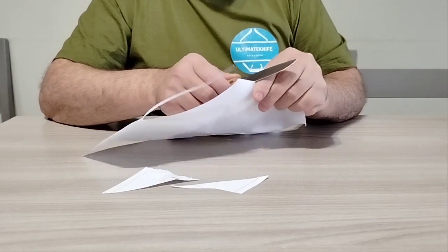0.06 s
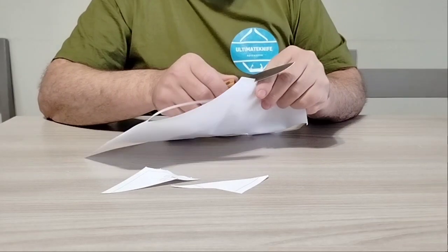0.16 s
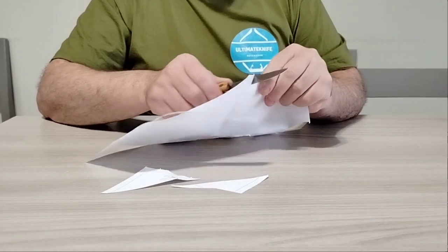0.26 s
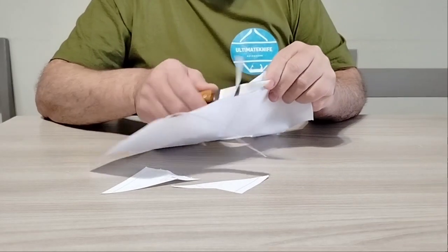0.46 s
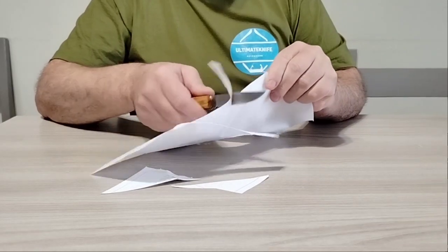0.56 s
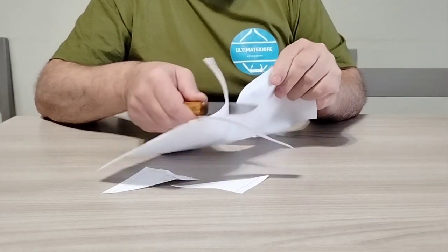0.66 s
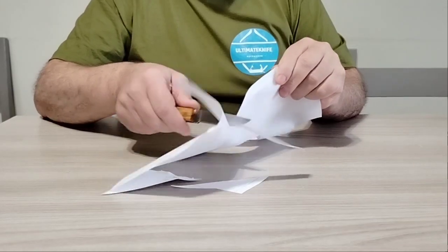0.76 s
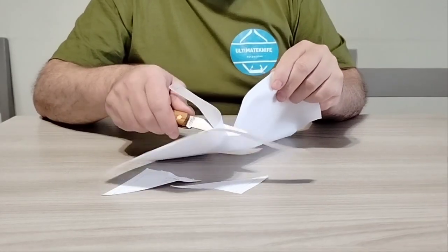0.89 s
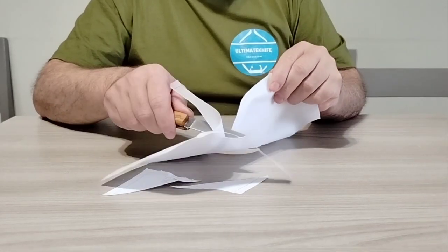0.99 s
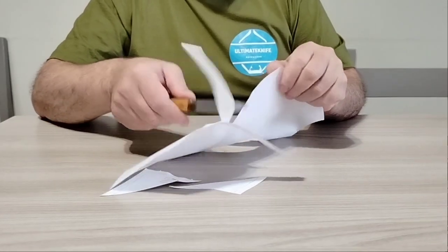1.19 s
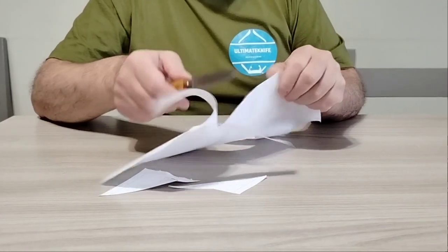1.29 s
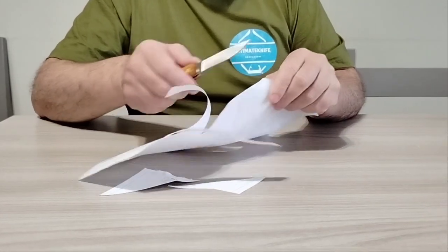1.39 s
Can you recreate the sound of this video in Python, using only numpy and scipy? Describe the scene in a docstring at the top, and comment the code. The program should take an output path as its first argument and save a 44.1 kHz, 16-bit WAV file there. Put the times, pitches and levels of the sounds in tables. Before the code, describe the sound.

A knife slices paper, heard close in a small, lively room. After near silence, a crisp crackling rip starts around 0.2 s, surges near 0.4 s, eases by 0.7 s, and swells again to a taut, ringing peak near 0.85 s. At 1.03 s the blade breaks free with a sharp crack, low puff and hollow sagging ring. Light flaps follow at 1.24 s, then bright papery rustling until about 1.45 s.

```python
"""Knife slicing paper

A sharp knife slices a hand-held sheet of paper above a table in a small, bare room; the stroke surges twice.
Random clicks stand for parting fibres: filters and resonances make them crackle, ring and shake the sheet.
The blade breaks free with a crack and the sheet flaps: shaped pulses and noise, low sine puffs, a sagging ring.
Fine filtered clicks make the blade's light slides and, in between, a rustle of the loose paper.
Decaying noise makes the room, steady noise its background."""
import sys
import numpy as np
from scipy import signal
from scipy.fft import rfft, irfft, next_fast_len
from scipy.io import wavfile
from scipy.ndimage import map_coordinates

SR = 44100
rng = np.random.default_rng(int(sys.argv[2]) if len(sys.argv) > 2 else 0)


def materialize(psi):
    """Save the field psi as 16-bit PCM at rate SR to the path in sys.argv[1].

    A 1-D psi becomes a single channel; in a 2-D psi each row is a channel.
    """
    bounded = np.clip(np.atleast_2d(psi).T, -1, 1)
    quanta = np.round(bounded * 32767).astype(np.int16)
    wavfile.write(sys.argv[1], SR, quanta)


N = 63945
TIME = np.arange(N) / SR

# Background spectrum. Each row: frequency in Hz, relative level in dB.
BACKGROUND_COLOUR = [(25, -12), (60, -15), (120, 0), (350, 0.5), (600, -10), (1100, -10.5), (3500, -8),
                     (7500, -8), (10000, -36), (16000, -45)]
BACKGROUND_DB = -71.5

# Decay of the room. Each row: frequency in Hz, t60 in seconds.
ROOM_T60 = [(100, .42), (400, .48), (1000, .44), (2400, .46), (4000, .38), (8000, .3), (15000, .21)]
# Strength of the room's tail. Each row: frequency in Hz, level in dB.
ROOM_LEVEL = [(100, -8), (350, -3.5), (750, -6.5), (1100, -1), (2300, 2), (4000, -3.5), (8000, -8),
              (11000, -0.5), (15000, 6)]
# The blade travels sideways. Each row: time in seconds, lag of the left channel in ms.
LEFT_LAG_MS = [(.55, 0.097), (.75, 0.27), (1.05, 0.248), (1.35, 0.085)]
ROOM_DELAY_S, DIRECT_DB = 0.011, 1.0
TABLE_T60_S, TABLE_DB, TABLE_ABOVE_HZ = 0.027, -2, 1140   # only short waves scatter off table and hands
LEAN_BASS_DB, LEAN_TREBLE_DB, LEAN_SPLIT_HZ = 0.77, 2.5, 1700   # added on the left, taken off on the right
SIDE_SHARE, SIDE_ABOVE_HZ = 0.8, 1370   # part of the clicks that differs between the sides

# The blade slides along the paper; in between, the loose paper rustles.
# Each row: start, length, attack and release in seconds, level in dB, low-pass corner in Hz.
SLIDES_AND_RUSTLE = [(-.02, 0.068, 0.046, 0.0092, -59, 7200), (1.212, 0.092, 0.015, 0.02, -62, 17000),
                     (1.32, 0.1, 0.057, .045, -44.5, 17200)]
# Spectrum of their hiss. Each row: frequency in Hz, relative level in dB.
HISS_COLOUR = [(100, -54), (500, -33), (1000, -23), (1500, -13.5), (2700, -19), (3500, -3.5), (5000, -14.5),
               (6900, 0.5), (8500, -6), (10000, -8), (15500, -13)]

# The bending sheet pushes air.
# Each row: start in seconds, level in dB, mean pitch in Hz, attack in seconds, t60 in seconds.
PUFFS = [(.86, -56, 165, 0.0099, 0.2), (.925, -54, 158, 0.032, 0.1), (1.025, -39.5, 108, 0.0022, 0.16),
         (1.2406, -45.5, 211.2, 0.002, 0.057), (1.241, -62.5, 115, 0.007, 0.49),
         (1.284, -49.5, 270.6, 0.016, 0.1)]

# Ring after the crack. Each row: starting frequency in Hz, width in Hz, level in dB.
AFTER_RING_MODES = [(1170, 45, -53), (1623, 53, -56.5), (2400, 520, -47.5)]
AFTER_RING_START_S, AFTER_RING_ATTACK_S, AFTER_RING_T60_S = 1.052, 0.025, 0.34
AFTER_RING_SAG_PER_S = 0.31   # exponential rate of the fall in pitch

# Cracks and flaps of the sheet.
# Each row: start in seconds, relative level in dB, low-pass corner in Hz, high-pass corner in Hz, t60 in seconds.
FLAPS = [(1.0254, 6, 3340, 910, 0.067), (1.031, 10, 4440, 370, 0.017), (1.0313, 13, 11500, 6700, 0.0039),
         (1.2265, -14, 9500, 4670, 0.025), (1.2412, -8, 1020, 150, 0.03), (1.2415, -11, 15200, 3540, 0.11),
         (1.295, -13, 1730, 453, 0.092), (1.342, -22.5, 2200, 169, 0.025), (1.433, -19, 1420, 610, 0.14)]
# Hollow knock of the sheet. Each row: frequency in Hz, relative level in dB, t60 in seconds.
KNOCK_MODES = [(396, -34.5, 0.038), (696, -29.5, 0.02), (2410, -29, 0.022)]
# Spectrum of a flap's crinkle. Each row: frequency in Hz, relative level in dB.
CRINKLE_COLOUR = [(40, -24), (210, -14), (385, 0.5), (530, -8), (720, 0.5), (930, 3), (1300, 0.5),
                  (1600, 1), (1950, -3), (2450, 4), (3200, 0.5), (4100, -3.5), (5600, -7), (7700, -2.5),
                  (9200, -16.5), (15000, -33)]

# Spectra of the fibres, the sheet's rasp in a short and a longer cut, and its low flutter.
# Each row: frequency in Hz, relative level in dB.
FIBRE_COLOUR = [(200, -88), (1400, -22), (2500, -4.5), (3400, 4), (4600, -5), (5600, -2.5), (6900, 0),
                (8300, -2.5), (9500, -11.5), (12000, -14), (15500, -21.5)]
SHORT_CUT_RASP_COLOUR = [(60, -85), (180, -28), (260, -5.5), (450, -12.5), (580, -3.5), (780, 4.5),
                         (1000, 2), (1250, -14), (1560, 3.5), (1880, -12.5), (2450, -1), (3150, -18),
                         (3700, -6), (4400, -15), (12000, -20)]
LONG_CUT_RASP_COLOUR = [(60, -80), (300, -7), (450, -12), (560, -9.5), (700, 0.5), (930, 1.5), (1250, 1),
                        (1520, -2), (1650, 2), (1950, -3), (2450, 0.5), (3100, -10), (4500, -11),
                        (12000, -41.5)]
FLUTTER_COLOUR = [(30, -51), (60, -46), (110, -39), (180, -20.5), (270, -2.5), (360, 2), (450, -3.5),
                  (600, -12), (1200, -44), (6000, -63)]
# Levels through the stroke, before any trim. Each row: time in seconds, level in dB.
FIBRE_LEVEL = [(0.195, -47.5), (0.213, -38.5), (0.309, -34.5), (0.399, -24.5), (0.693, -40), (0.713, -31.5),
               (0.855, -22.5), (0.865, -39), (0.923, -31), (0.951, -43), (1.02, -56.5)]
RASP_LEVEL = [(0.195, -52.5), (0.215, -44), (0.321, -41.5), (0.336, -31.5), (0.393, -41.5), (0.441, -34.5),
              (0.679, -37), (0.827, -32.5), (0.839, -29), (1.02, -55)]
FLUTTER_LEVEL = [(0.195, -68), (0.271, -67.5), (0.409, -48.5), (0.525, -56), (0.569, -47.5), (0.755, -69),
                 (0.777, -61), (0.857, -43.5), (0.921, -48), (0.954, -43), (1.005, -74)]
# Main pitch of the paper at the cut, before it wanders. Each row: time in seconds, frequency in Hz.
RING_PITCH = [(0.19, 3910), (0.576, 3050), (0.632, 3150), (0.672, 3330), (0.86, 3470)]
# Steady upper modes at the cut. Each row: frequency in Hz, width in Hz, relative level in dB.
UPPER_MODES = [(6726, 360, -2), (7680, 570, -7.5)]
# Upper modes against the main ring. Each row: time in seconds, level in dB.
UPPER_LEVEL = [(.2, 5), (.3, -2.5), (.39, -9.5), (.52, 1.5), (.72, -0.5), (.84, -0.5)]
# Tautness of the paper at the edge. Each row: time in seconds, level of the ring against the snaps in dB.
TAUTNESS = [(.2, 8), (.32, 6.5), (.395, 6.5), (.46, 3), (.62, -17), (.69, -5), (.72, -4.5), (.852, 14.5),
            (.875, -7), (1.0, -16)]
# Resonances of the whole sheet. Each row: mean frequency in Hz, width in Hz, level against the rasp in dB.
SHEET_MODES = [(737, 51, -10.5), (1214, 104, -10)]
# The edge snags and jerks through. Each row: time in seconds, boost in dB.
SNAGS = [(.393, 2.2), (.803, 2.6), (.8305, 2.7), (.84, 1.8), (0.856, 4.1)]
SNAG_S = 0.0038   # from its peak until the boost in dB falls to 1/e
SNAPS_PER_S, SNAP_SPREAD_DB = 3000, 2.5
CATCH_HZ, CATCH_DB = 162, 2   # the edge catches and slips unevenly
FIBRE_TRIM_DB, RASP_TRIM_DB = -0.5, -0.5
RING_WIDTH_HZ = 345
WANDER_SHARE, WANDER_HZ = 0.033, 14.5
FILL_START_S, FILL_END_S, RELEASE_S = 0.308, 0.338, 0.042

CUTOFF_HZ = 15600


def from_db(db):
    """Decibels to gain."""
    return 10 ** (np.asarray(db) / 20)


def rms_one(x):
    """Scale to unit power."""
    return x / np.sqrt(np.mean(x ** 2) + 1e-20)


def in_time(points):
    """Read a curve at every sample."""
    seconds, value = np.transpose(points)
    return np.interp(TIME, seconds, value)


def at_hz(points, hz):
    """Read a table on a log-frequency axis."""
    table_hz, value = np.transpose(points)
    return np.interp(np.log(hz + 1e-9), np.log(table_hz), value)


def colour(x, spectrum):
    """Causal (minimum-phase) filter with the given spectrum, built by folding its cepstrum."""
    size = 2 * next_fast_len(N)
    hz = np.arange(size // 2 + 1) * SR / size
    cepstrum = irfft(np.log(from_db(at_hz(spectrum, hz))))
    cepstrum[1:size // 2] *= 2
    cepstrum[size // 2 + 1:] = 0
    response = np.exp(rfft(cepstrum))
    return irfft(rfft(x, size) * response)[..., :N]


def butter(x, hz, kind):
    """Butterworth filter of design order two."""
    sos = signal.butter(2, np.clip(hz, 10, SR * .45), kind, fs=SR, output="sos")
    return signal.sosfilt(sos, x + 1e-18)


def drift(hz):
    """Smooth chance with a spread of 1: low-passed noise, its filter start-up dropped."""
    return rms_one(butter(rng.standard_normal(2 * N), hz, "low")[N:])


def wandering(hz):
    """The pitch of a resonance wanders as the paper bends."""
    return hz * (1 + WANDER_SHARE * drift(WANDER_HZ))


def resonate(x, hz, width_hz):
    """A moving resonance: shift its centre to 0 Hz, smooth with one pole, shift back."""
    turn = np.exp(2j * np.pi * np.cumsum(hz) / SR)
    pole = np.exp(-np.pi * width_hz / SR)
    smooth = signal.lfilter([1 - pole], [1, -pole], x / turn)
    return rms_one((smooth * turn).real)


def swell(start_s, attack_s, t60_s):
    """A straight rise, then an exponential decay."""
    rise = np.clip((TIME - start_s) / attack_s, 0, 1)
    return rise * from_db(-60 * np.maximum(TIME - start_s - attack_s, 0) / t60_s)


def stereo_noise(alike_below_hz=1300):
    """Two channels of noise, alike in the bass and differing in the treble."""
    mid, side = rng.standard_normal((2, N))
    side = signal.lfilter(*signal.butter(1, alike_below_hz, "high", fs=SR), side)
    return (mid + side * np.array([[1], [-1]])) / np.sqrt(2)


def stereo_snaps(per_s, spread_db):
    """Random clicks of uneven size, each thrown unevenly to the two sides."""
    sizes = from_db(spread_db * np.minimum(rng.exponential(1, N), 4))
    clicks = sizes * rng.choice([-1, 1], N) * (rng.random(N) < per_s / SR)
    side = SIDE_SHARE * butter(clicks * rng.choice([-1, 1], N), SIDE_ABOVE_HZ, "high")
    return rms_one(clicks + side * np.array([[1], [-1]]))


def background():
    """Faint steady noise."""
    return from_db(BACKGROUND_DB) * rms_one(colour(stereo_noise(), BACKGROUND_COLOUR))


def lean_left(x):
    """The left side is louder, mostly in the treble."""
    bass = signal.lfilter(*signal.butter(1, LEAN_SPLIT_HZ, fs=SR), x)
    treble = x - bass
    sides = np.array([[1], [-1]])
    return bass * from_db(LEAN_BASS_DB * sides) + treble * from_db(LEAN_TREBLE_DB * sides)


def room_tail():
    """Reverberation: half-octave bands of noise, each with its own level and decay."""
    edges_hz = 60 * 2 ** (np.arange(18) / 2)
    noises = [stereo_noise(), stereo_noise()]   # neighbouring bands take turns
    tail = 0
    for k, (low_hz, high_hz) in enumerate(zip(edges_hz, edges_hz[1:])):
        hz = np.sqrt(low_hz * high_hz)
        decay = from_db(-60 * TIME / at_hz(ROOM_T60, hz)) * (TIME > ROOM_DELAY_S)
        band = butter(noises[k % 2], [low_hz, high_hz], "band")
        tail = tail + from_db(at_hz(ROOM_LEVEL, hz)) * band * decay / np.linalg.norm(decay)
    return tail


def table_scatter():
    """Short waves scatter off the table and hands: a brief burst of high-passed noise."""
    decay = from_db(-60 * TIME / TABLE_T60_S)
    burst = butter(stereo_noise() * decay, TABLE_ABOVE_HZ, "high")
    return from_db(TABLE_DB) * burst / np.linalg.norm(decay)


def room(x):
    """Direct sound, late on the left as the blade travels, plus scatter and tail; all lean left."""
    response = room_tail() + table_scatter()
    lag_samples = in_time(LEFT_LAG_MS) * SR / 1000
    left = map_coordinates(x[0], [np.arange(N) - lag_samples], order=3)
    direct = from_db(DIRECT_DB) * np.array([left, x[1]])
    return lean_left(direct + signal.fftconvolve(x, response, axes=1)[:, :N])


def slides_and_rustle(uneven_db=0.3, uneven_hz=78):
    """Steel on paper, and once the rustling loose paper, give a fine, bright hiss of dense clicks."""
    grains = rms_one(colour(stereo_snaps(per_s=7300, spread_db=3.0), HISS_COLOUR))
    hiss = from_db(uneven_db * drift(uneven_hz)) * grains
    out = 0
    for start_s, length_s, attack_s, release_s, db, low_pass_hz in SLIDES_AND_RUSTLE:
        rise = np.clip((TIME - start_s) / attack_s, 0, 1)
        fall = np.exp(-np.maximum(TIME - start_s - length_s, 0) / release_s)
        out = out + from_db(db) * rise * fall * butter(hiss, low_pass_hz, "low")
    return out


def puffs(wobble_share=0.1227, wobble_hz=69):
    """Soft low thumps of the bending sheet: swelling sines, unsteady in pitch."""
    out = 0
    for start_s, db, mean_hz, attack_s, t60_s in PUFFS:
        hz = mean_hz * (1 + wobble_share * drift(wobble_hz))
        tone = np.sin(2 * np.pi * np.cumsum(hz) / SR)
        out = out + from_db(db) * swell(start_s, attack_s, t60_s) * tone
    return out


def after_ring():
    """A hollow, grainy ring that fades and sinks a little as the freed sheet goes slack."""
    sag = np.exp(-AFTER_RING_SAG_PER_S * np.maximum(TIME - AFTER_RING_START_S, 0))
    out = 0
    for hz, width_hz, db in AFTER_RING_MODES:
        ring = resonate(stereo_snaps(per_s=2700, spread_db=1.0), hz * sag, width_hz)
        ring = butter(ring, [hz - 2 * width_hz, hz + 2 * width_hz], "band")
        out = out + from_db(db) * rms_one(ring)
    return swell(AFTER_RING_START_S, AFTER_RING_ATTACK_S, AFTER_RING_T60_S) * out


def flaps(crinkle_db=-1, pulse_db=-8):
    """Each flap is one sharp pulse that knocks the sheet's modes, and a dying crinkle of noise."""
    crinkles, pulses = np.zeros((2, N)), np.zeros(N)
    for start_s, db, low_pass_hz, high_pass_hz, t60_s in FLAPS:

        def contact(x):
            """Band and level of this flap."""
            return from_db(db) * butter(butter(x, low_pass_hz, "low"), high_pass_hz, "high")

        age = np.arange(N) - int(start_s * SR)
        decay = (age >= 0) * from_db(-60 * np.abs(age) / SR / t60_s)
        crinkles += contact(stereo_noise() * decay / np.linalg.norm(decay))
        pulses += contact(1.0 * (age == 0))
    knock = sum(from_db(db - 60 * TIME / t60_s) * np.sin(2 * np.pi * hz * TIME)
                for hz, db, t60_s in KNOCK_MODES)
    rustle = colour(from_db(crinkle_db) * crinkles + from_db(pulse_db) * pulses, CRINKLE_COLOUR)
    return rustle + signal.fftconvolve(pulses, knock)[:N]


def cutting_edge(tear):
    """Parting fibres crackle and ring the paper at the edge, the more the tauter it is."""
    upper = sum(from_db(db) * resonate(tear(), np.full(N, hz), width_hz)
                for hz, width_hz, db in UPPER_MODES)
    main = resonate(tear(), wandering(in_time(RING_PITCH)), RING_WIDTH_HZ)
    ring = main + from_db(in_time(UPPER_LEVEL)) * upper
    ring = rms_one(butter(ring, [1800, 11000], "band"))
    snaps = rms_one(colour(tear(), FIBRE_COLOUR))
    taut = from_db(in_time(TAUTNESS))
    mix = (snaps + taut * ring) / np.sqrt(1 + taut ** 2)
    return from_db(in_time(FIBRE_LEVEL) + FIBRE_TRIM_DB) * mix


def sheet_rasp(tear):
    """The shaken sheet rasps: hollow while the cut is short, filling out as it lengthens."""
    full = np.interp(TIME, [FILL_START_S, FILL_END_S], [0, 1])
    short_cut = rms_one(colour(tear(), SHORT_CUT_RASP_COLOUR))
    long_cut = rms_one(colour(tear(), LONG_CUT_RASP_COLOUR))
    rasp = np.sqrt(1 - full) * short_cut + np.sqrt(full) * long_cut
    modes = sum(from_db(db) * resonate(tear(), wandering(hz), width_hz)
                for hz, width_hz, db in SHEET_MODES)
    return from_db(in_time(RASP_LEVEL) + RASP_TRIM_DB) * rms_one(rasp + modes)


def sheet_flutter(tear):
    """The snaps shake the sheet into a low flutter."""
    return from_db(in_time(FLUTTER_LEVEL)) * rms_one(colour(tear(), FLUTTER_COLOUR))


def cut():
    """Fibre snaps, uneven as the edge catches and snags, drive edge, rasp and flutter."""
    snag_db = sum(db * np.exp(-((TIME - s) / SNAG_S) ** 2) for s, db in SNAGS)
    catching = from_db(CATCH_DB * drift(CATCH_HZ) + snag_db)

    def tear():
        """Fresh snaps under the shared catching."""
        return catching * stereo_snaps(SNAPS_PER_S, SNAP_SPREAD_DB)

    start_s, end_s = FIBRE_LEVEL[0][0], FIBRE_LEVEL[-1][0]
    cutting = (TIME > start_s) * np.exp(-np.maximum(TIME - end_s, 0) / RELEASE_S)
    return cutting * (cutting_edge(tear) + sheet_rasp(tear) + sheet_flutter(tear))


def scene(low_cut_hz=75):
    """Knife and paper in the room, over its background; the deep bass is cut away."""
    paper = cut() + flaps() + puffs() + slides_and_rustle() + after_ring()
    return room(butter(paper, low_cut_hz, "high")) + background()


def record(dry):
    """The highest peaks are rounded and the top is cut steeply."""
    steep = signal.ellip(10, .2, 80, CUTOFF_HZ, fs=SR, output="sos")
    return signal.sosfilt(steep, np.tanh(dry))


dry = scene()
out = record(dry)
materialize(out)
```